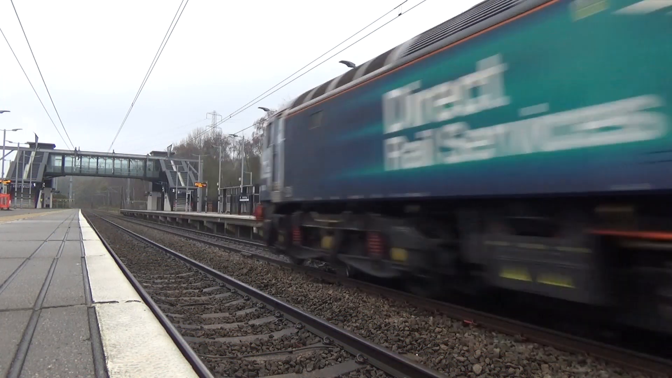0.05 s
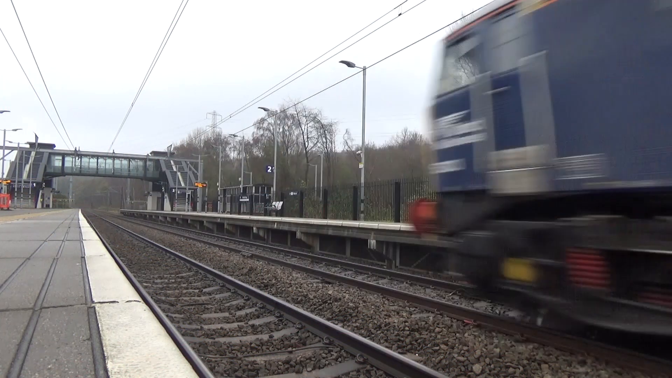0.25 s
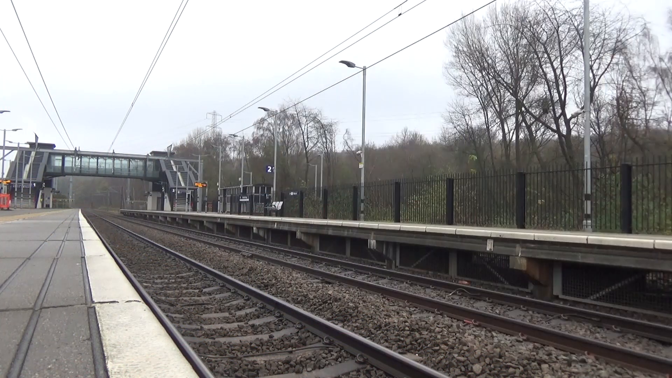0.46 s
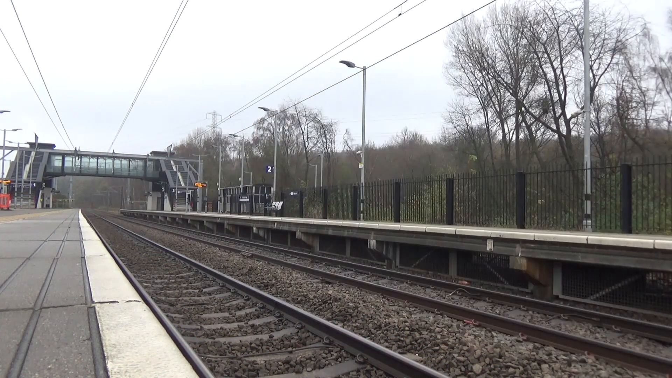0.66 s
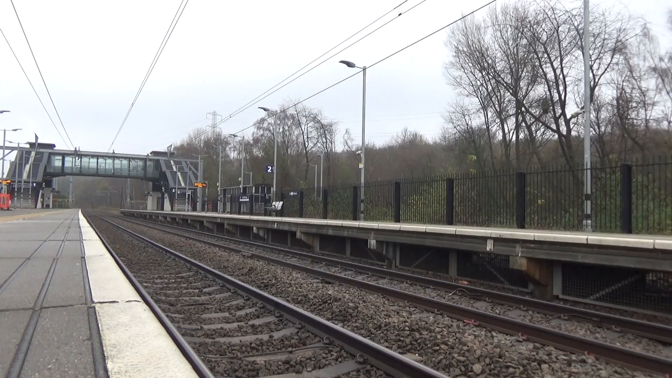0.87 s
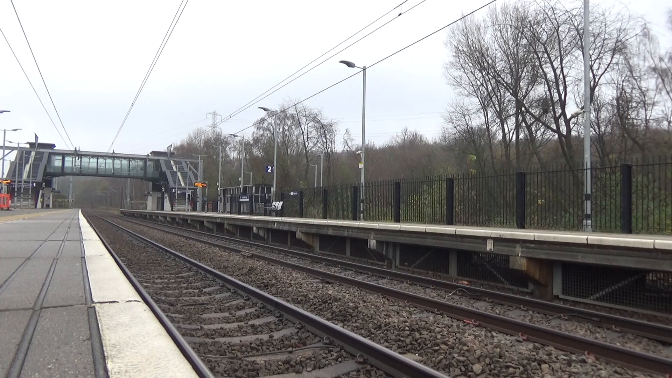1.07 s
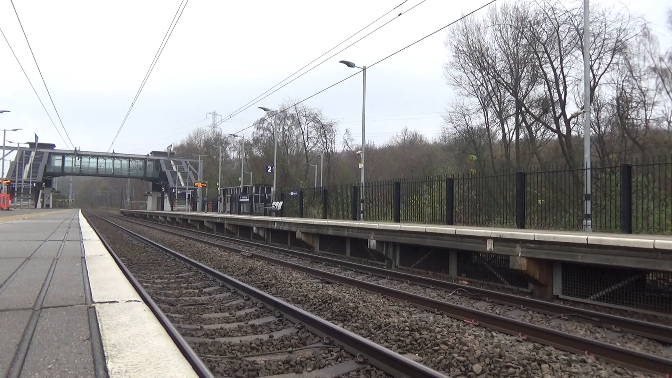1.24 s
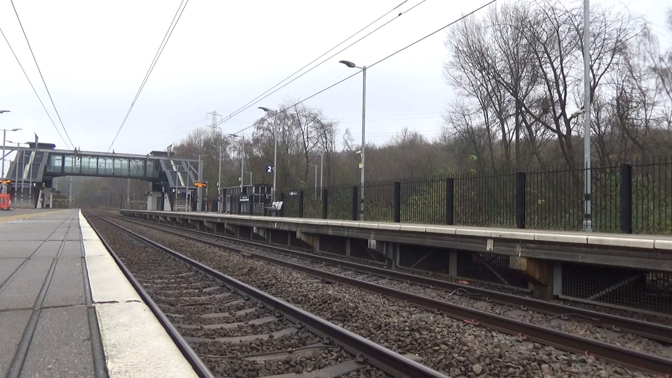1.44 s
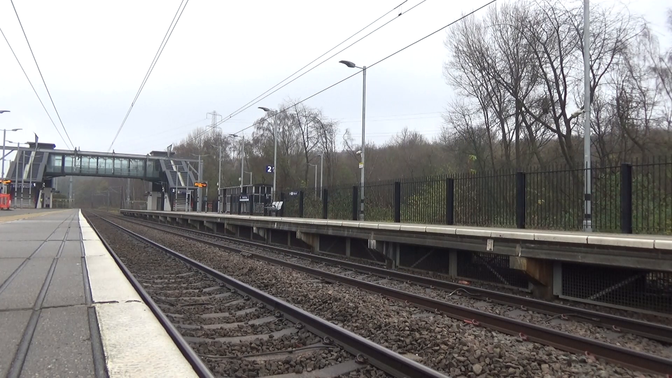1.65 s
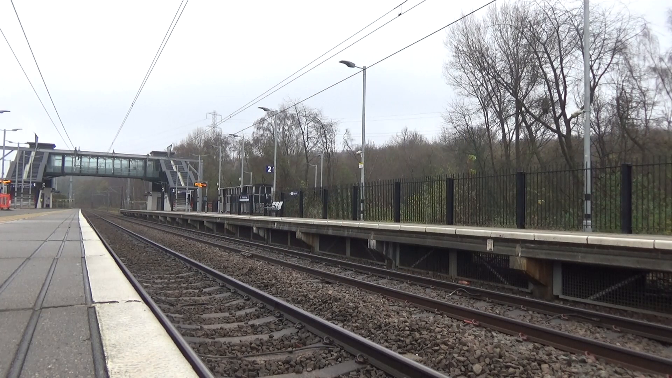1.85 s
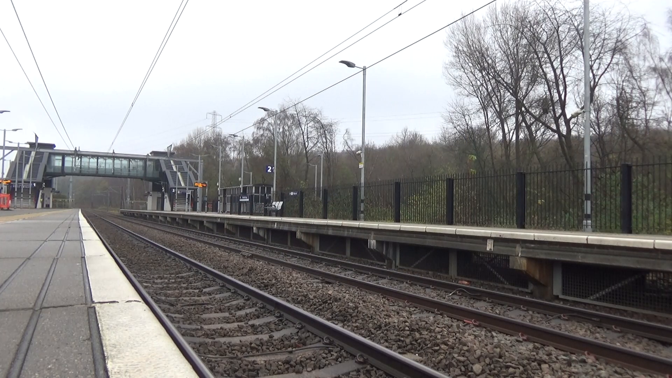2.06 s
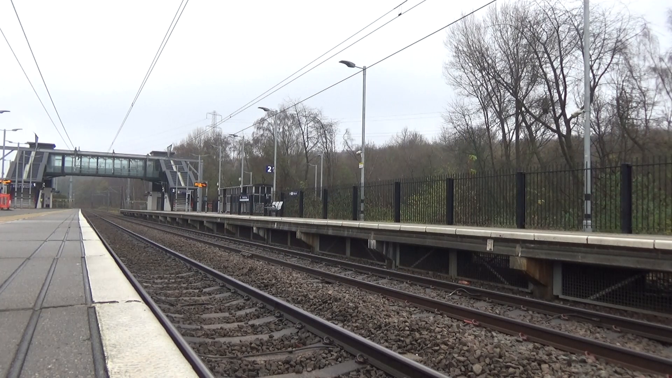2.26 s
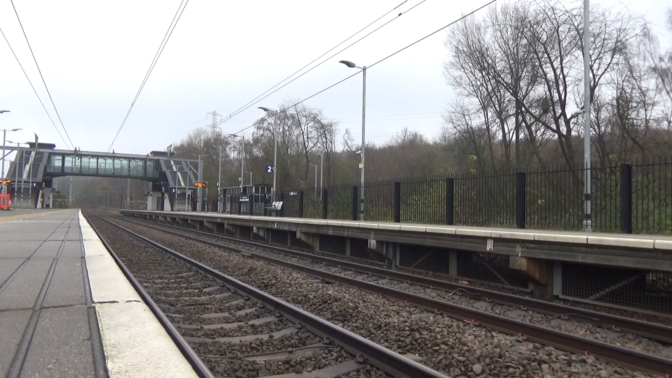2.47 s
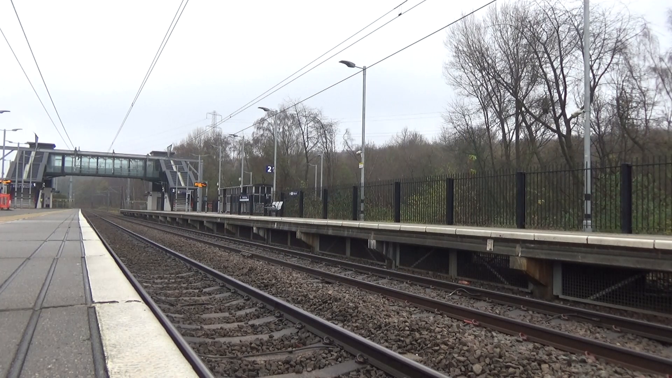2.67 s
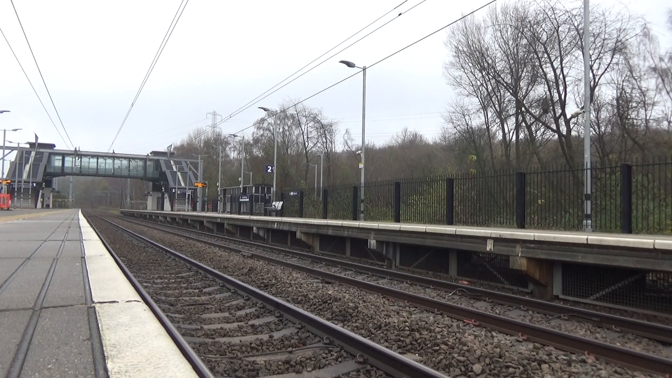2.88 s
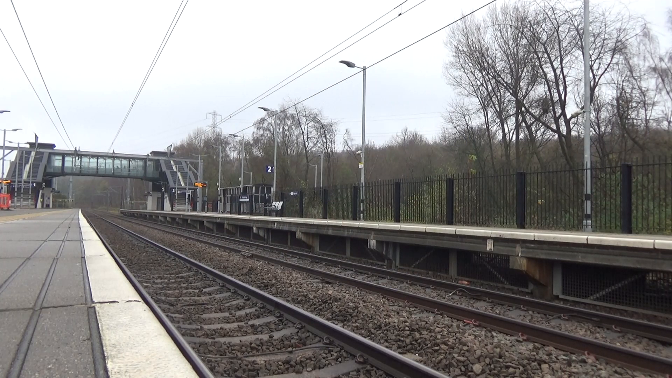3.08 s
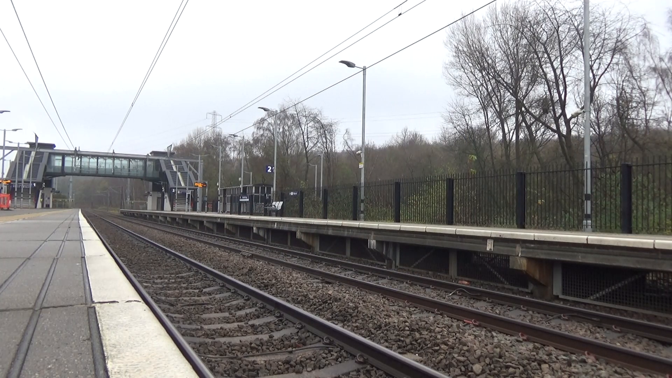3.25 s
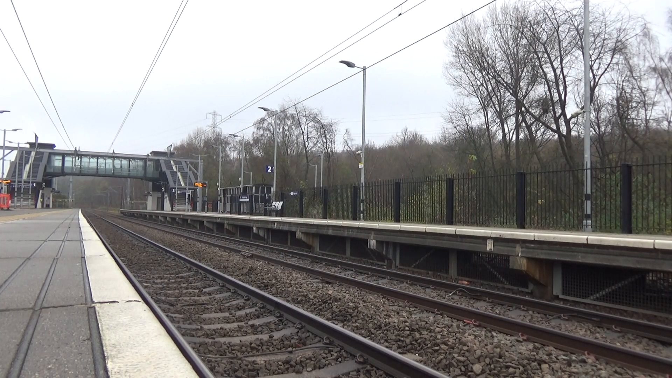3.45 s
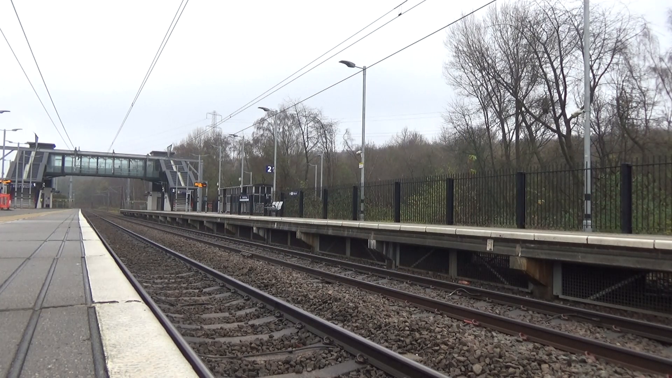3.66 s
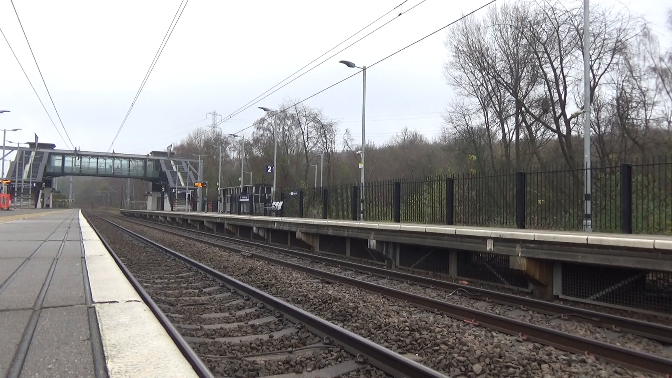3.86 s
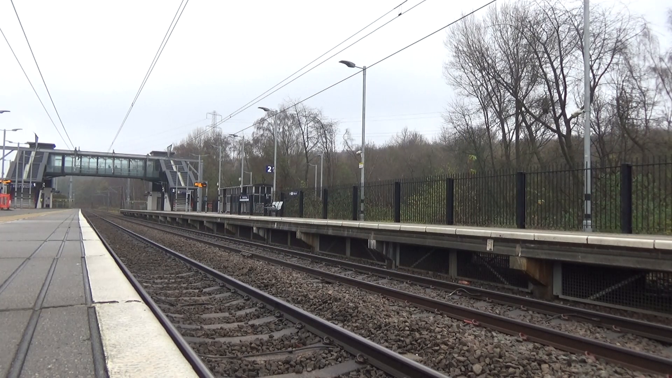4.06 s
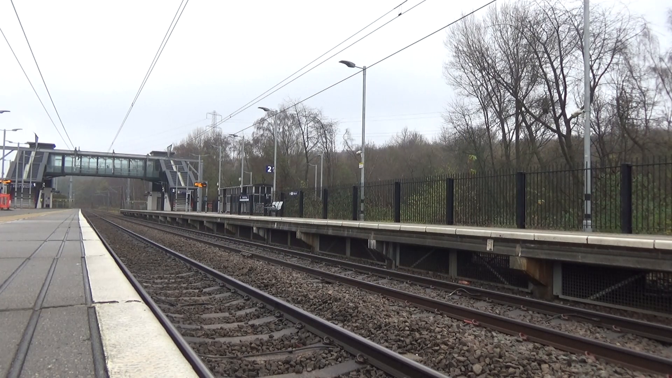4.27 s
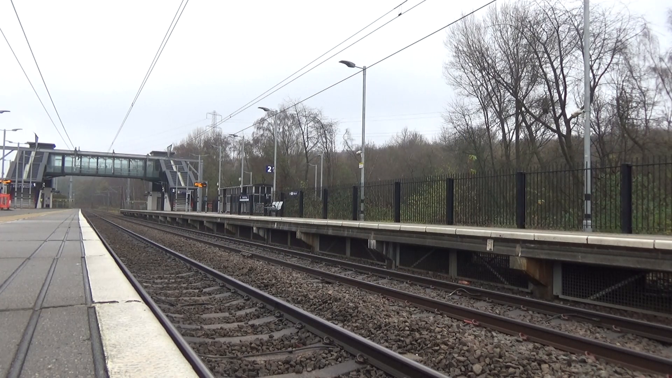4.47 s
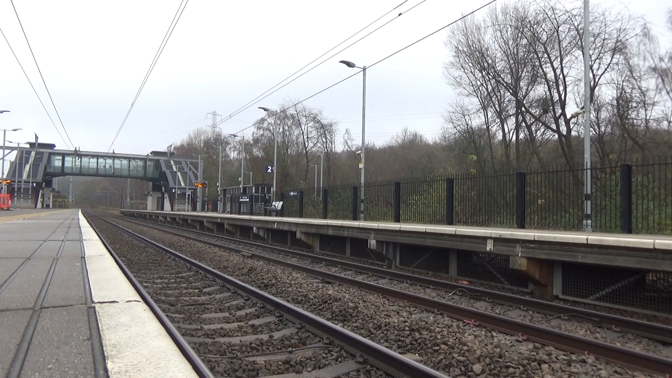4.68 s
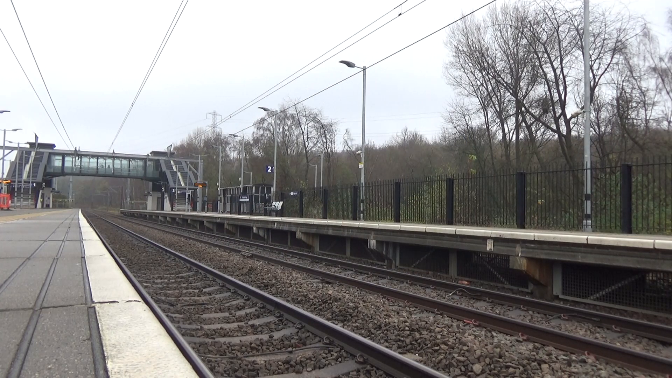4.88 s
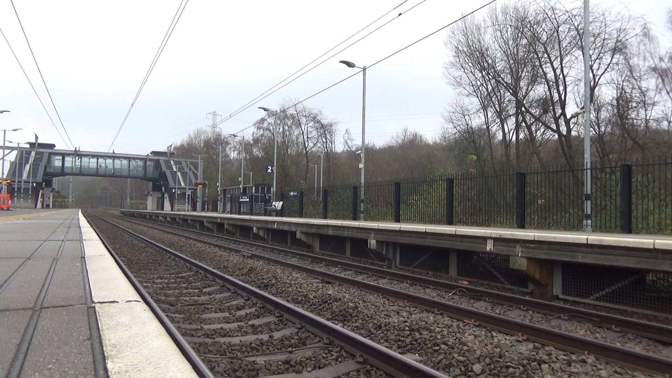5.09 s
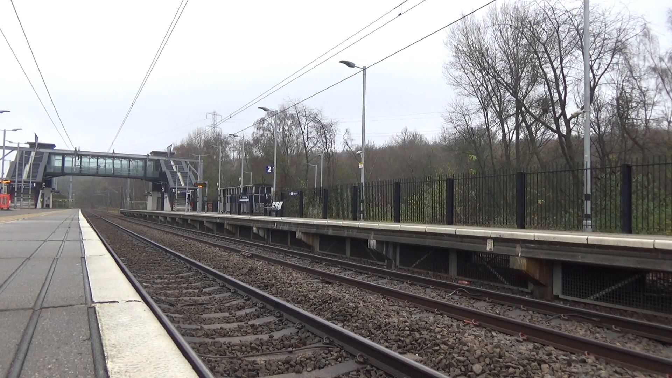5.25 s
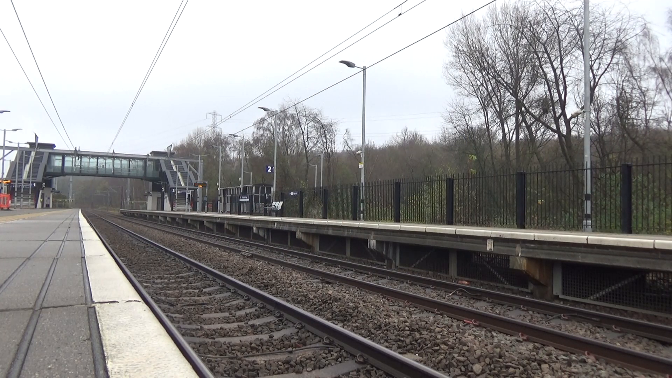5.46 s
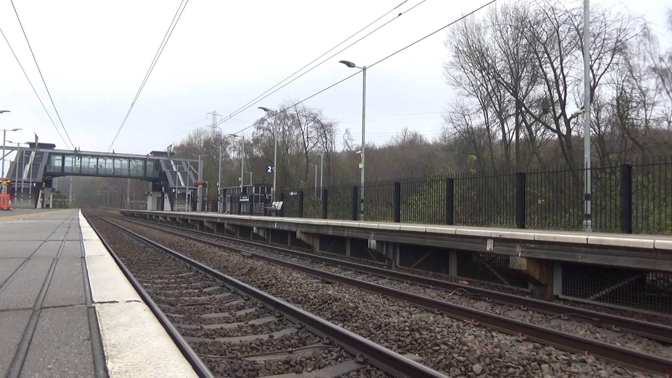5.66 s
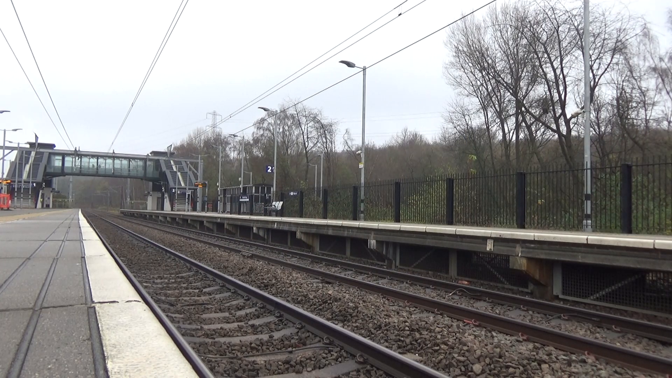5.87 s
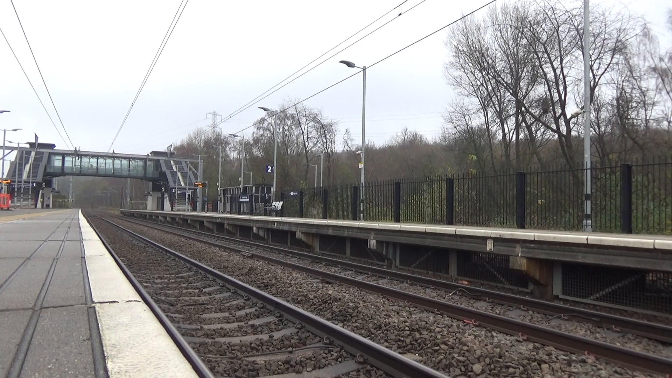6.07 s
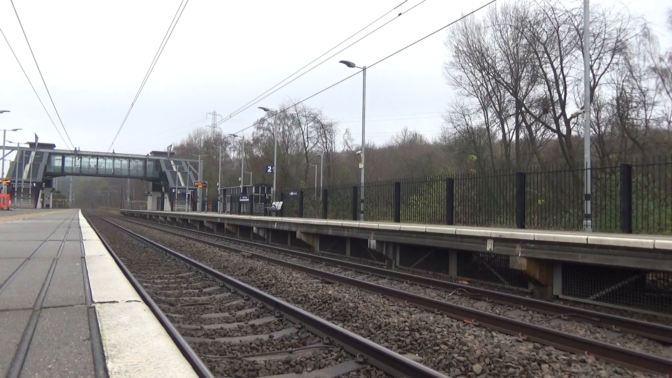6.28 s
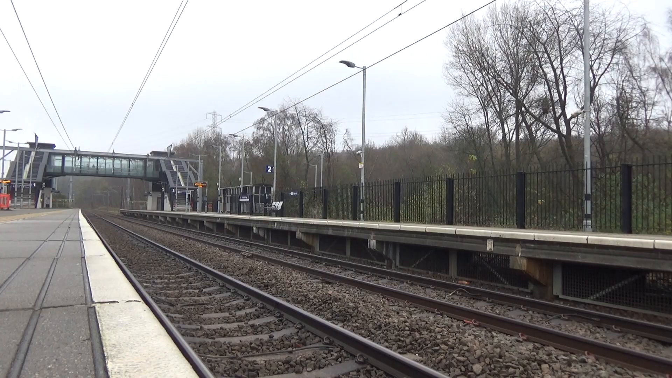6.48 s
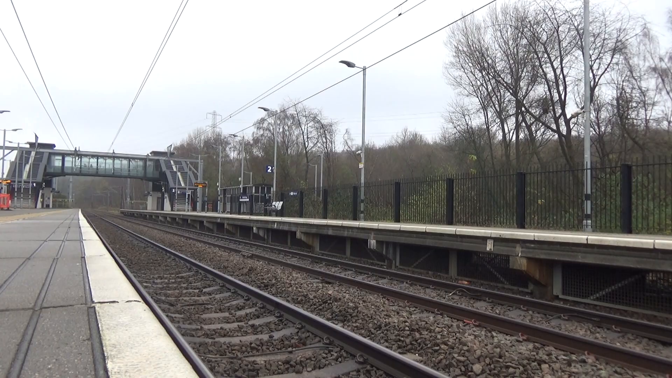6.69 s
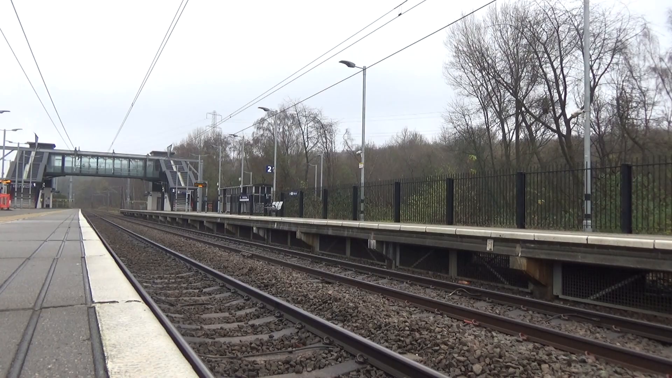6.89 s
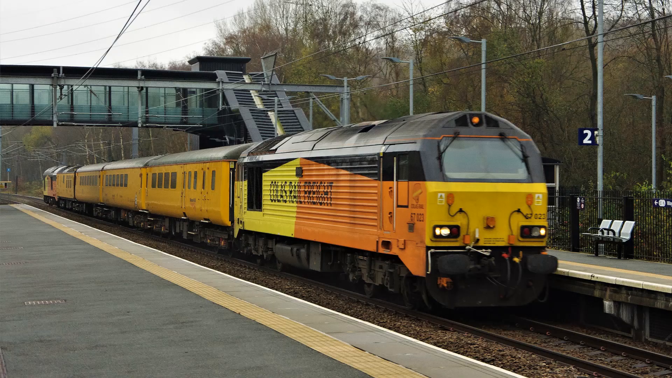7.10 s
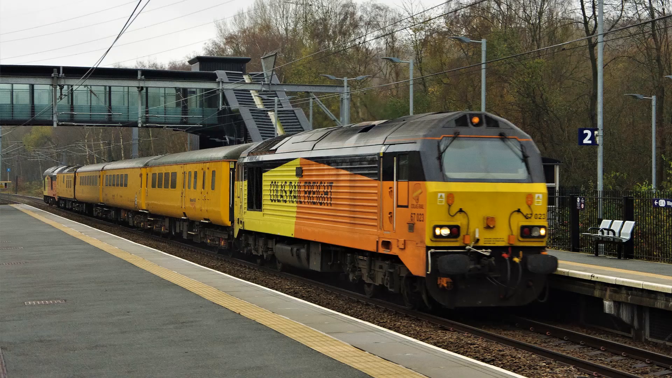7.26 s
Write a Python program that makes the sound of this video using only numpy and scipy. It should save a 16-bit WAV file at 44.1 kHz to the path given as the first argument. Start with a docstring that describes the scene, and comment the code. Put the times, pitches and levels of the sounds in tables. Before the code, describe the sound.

From the first instant a diesel locomotive rushes close past an outdoor platform with gritty roar, throbbing engine and brief metallic squeals. Its brightness drops away within a second, leaving humming, rapid wheel thumps and thin singing rails. A small bird chirps from three seconds. The train fades while low wake gusts buffet and overload the microphone, then everything stops abruptly at seven seconds.

```python
"""The rear diesel locomotive of a short train sweeps past a platform: roar, squeals and a howl, all noise or tones.
Its engine orders beat into a throb; a worn wheel thumps nine times a second and rings; steady tones hum, a thin
whine runs on. As it runs away down the line the rails sing in narrow bands, and from 3 s a small bird chirps.
From about 5 s the wake buffets the microphone in runs of short pressure swings; at 7 s the sound stops dead."""
import sys
import numpy as np
from scipy import signal
from scipy.fft import rfft, irfft, next_fast_len
from scipy.io import wavfile
from scipy.ndimage import uniform_filter1d

SR = 44100
rng = np.random.default_rng(int(sys.argv[2]) if len(sys.argv) > 2 else 0)


def materialize(psi):
    """Save the field psi as 16-bit PCM at rate SR to the path in sys.argv[1].

    A 1-D psi becomes a single channel; in a 2-D psi each row is a channel.
    """
    bounded = np.clip(np.atleast_2d(psi).T, -1, 1)
    quanta = np.round(bounded * 32767).astype(np.int16)
    wavfile.write(sys.argv[1], SR, quanta)


N = 323243
T = np.arange(N) / SR
FREQ = np.fft.rfftfreq(next_fast_len(N), 1 / SR)
WHEEL_HZ, FIRST_THUMP_S = 9.04, .065

# base level of rolling and hum: t/s, relative level/dB
TRAIN_LEVEL = [(0, -23), (.3, -18.5), (1.2, -25.5), (3.15, -23.5), (4.3, -28.5), (7, -36.5)]
# engine speed as heard: t/s, shaft rate/Hz
ENGINE_SPEED = [(0, 8.2), (.18, 9.1), (.35, 9.1), (.65, 6.7), (1.1, 7.8), (2.6, 7.73), (3.3, 8.18),
                (4.2, 7.87), (7, 8.7)]
# All *_swell tables: top/dB, reached/s, held/s, rise/(dB/s), fade/(dB/s)
# All spectra: f/Hz, relative density/dB


def undb(db):
    """Decibels to gain."""
    return 10 ** (np.asarray(db) / 20)


def unit(x):
    """Scale to rms 1."""
    return x / np.sqrt(np.mean(x ** 2))


def curve(rows):
    """Second column of a table, joined by straight lines in time."""
    t_s, value = np.transpose(rows)
    return np.interp(T, t_s, value)


def across(points):
    """Points joined on a log-frequency axis."""
    hz, value = np.transpose(points)
    return np.interp(np.log(FREQ + 1), np.log(hz), value)


def shape(x, response):
    """Filter by a frequency response."""
    size = next_fast_len(N)
    return irfft(rfft(x, size) * response, size)[..., :N]


def colour(x, points):
    """Filter x by a spectrum, then scale to rms 1."""
    return unit(shape(x, undb(across(points))))


def noise():
    """White noise."""
    return rng.standard_normal(N)


def walk(rate_hz, size=N):
    """Random levels held 1 / rate_hz and smoothed twice; spread near 1."""
    k = int(SR / rate_hz)
    held = np.repeat(rng.standard_normal(size // k + 1), k)
    return 1.35 * uniform_filter1d(uniform_filter1d(held, k), k)[:size]


def swell(top_db, reached_s, hold_s, rise_db_per_s, fade_db_per_s):
    """A gain that rises, holds and fades at even rates in dB."""
    before_s = np.maximum(reached_s - T, 0)
    after_s = np.maximum(T - reached_s - hold_s, 0)
    return undb(top_db - rise_db_per_s * before_s - fade_db_per_s * after_s)


def blows(rows, decay_s, rise_s=1 / SR):
    """Envelope of a table of (t/s, level/dB) blows that die away."""
    out = np.zeros(N)
    for t_s, db in rows:
        rise = 1 - np.exp(-np.maximum(T - t_s, 0) / rise_s)
        out += undb(db) * rise * np.exp(-np.abs(T - t_s) / decay_s)
    return out


def rough_tone(cycles, rate_hz):
    """A tone whose strength and phase flutter about rate_hz times a second; rms near 1."""
    in_phase = walk(rate_hz, size=len(cycles)) * np.sin(2 * np.pi * cycles)
    quadrature = walk(rate_hz, size=len(cycles)) * np.cos(2 * np.pi * cycles)
    return in_phase + quadrature


def tread(repeat):
    """Wheel roughness recurs every turn (power share repeat); rail roughness is always new."""
    one_turn = noise()[:round(SR / WHEEL_HZ)]
    return np.sqrt(repeat) * np.resize(one_turn, N) + np.sqrt(1 - repeat) * noise()


def thumps(lead_s, rise_s, decay_s):
    """One pulse for every turn of the worn wheel, swelling as it passes."""
    thump_swell = (0.87, 1.37, 1, 8.8, 2.8)
    since_s = (T - FIRST_THUMP_S + lead_s) % (1 / WHEEL_HZ)
    return swell(*thump_swell) * (1 - np.exp(-since_s / rise_s)) * np.exp(-since_s / decay_s)


def to_right(x, pan_db, scatter_db):
    """Microphone directivity varies with frequency; scattered sound fills the left side."""
    # f/Hz, multiplier of the mean left-right difference/1
    pan_share = [(60, 0.13), (110, -0.5), (200, 0.55), (350, 0.38), (640, 1.06), (1160, 0.57), (2100, 0.7),
                 (3800, 0.66), (6800, 0.4), (12000, 0)]
    mean_db = np.mean(pan_db)
    ratio = undb(mean_db * across(pan_share))
    left, right = shape(x, 2 * ratio / (1 + ratio)), shape(x, 2 / (1 + ratio))
    lag_s = T[:SR // 5]
    tail = rng.standard_normal(len(lag_s)) * np.exp(-lag_s / 0.02)
    scatter = signal.fftconvolve(x, tail / np.linalg.norm(tail))[:N]
    moving = undb(0.78 * (pan_db - mean_db))
    return np.array([left * moving + undb(scatter_db) * scatter, right])


def bird():
    """Thin, very high chirps with sliding pitch; decaying noise echoes linger among the trees."""
    # t/s, level before chirp_db/dB, f/Hz, length/s, opening pitch offset/Hz
    chirp_rows = [(3.09, -39, 8870, .022, 100), (3.489, -37, 8240, .022, 0), (4.22, -42, 8420, .03, 100),
                  (4.755, -44, 8240, .035, -150), (4.96, -48, 8300, .03, 0), (5.04, -48, 9000, .022, 900),
                  (5.403, -46, 8170, .03, 100), (5.618, -43, 8210, .035, -150),
                  (5.715, -51, 9030, .02, 700), (5.873, -43, 8260, .028, 0),
                  (6.106, -44.5, 8750, .028, 1000), (6.356, -39, 8190, .034, 0),
                  (6.612, -50, 8190, .035, -100), (6.778, -42.5, 8320, .028, -100),
                  (6.868, -47.5, 8850, .028, 900)]
    chirp_db, trees_db, trees_decay_s, slide_s = -7.5, -1, .05, .008
    out = np.zeros(N)
    age_s = T[:SR // 8]
    for t_s, db, hz, length_s, slide_hz in chirp_rows:
        pitch_hz = hz + slide_hz * np.exp(-age_s / slide_s) + 40 * walk(500, size=len(age_s))
        envelope = undb(db + chirp_db) * np.sin(np.pi * np.clip(age_s / length_s, 0, 1))
        start = int(t_s * SR)
        out[start:start + len(age_s)] += envelope * np.sin(2 * np.pi * np.cumsum(pitch_hz) / SR)
    trees = rng.standard_normal((2, SR // 4)) * np.exp(-T[:SR // 4] / trees_decay_s)
    echo = signal.fftconvolve(out[None], trees / np.linalg.norm(trees))[:, :N]
    return out + undb(trees_db) * echo


def rails():
    """Steel carries narrow treble bands far along the track, pulsing with the wheel; grit sets off pings."""
    singing_spectrum = [(4000, -47), (5600, -19.5), (6350, -18), (6560, 0), (6820, 0.5), (7100, -2),
                        (7700, -21.5), (9300, -49), (10400, -36), (11100, -14.5), (11600, -14.5)]
    hiss_spectrum = [(2500, -3), (4400, -6.5), (5600, 4), (6500, 12), (7400, 8.5), (9200, 1), (10600, 6),
                     (11650, 4.5)]
    # rail pings: t/s, level before the common -8 dB/dB
    ping_rows = [(0.939, -27), (1.717, -24), (2.705, -23), (2.814, -18), (3.034, -15.5), (3.912, -19),
                 (4.352, -26), (4.571, -29)]
    singing_swell = (-33, 3, 0.59, 3.5, 6)
    modes_swell = (-42, 3, 0.43, 10.5, 3)
    hiss_near_swell = (-33, 0, 0.55, 10, 48)
    hiss_swell = (-36, 0.31, 2, 14, 8.5)
    sizzle_swell = (-52, 4.5, 0.2, 30, 60)
    far_db, hiss_pulse_db = -49, 0.5
    turn = np.cos(2 * np.pi * WHEEL_HZ * (T - FIRST_THUMP_S))

    singing = colour(tread(0.11), singing_spectrum) * np.hypot(swell(*singing_swell), undb(far_db))
    modes = sum(rough_tone(hz * T, rate_hz=55) for hz in (6792, 6863))
    singing += modes * swell(*modes_swell)
    flutter = undb(1.3 * walk(80) + 0.8 * turn)

    hiss = colour(noise(), hiss_spectrum) * np.hypot(swell(*hiss_near_swell), swell(*hiss_swell))
    hiss *= undb(1.1 * walk(90) + hiss_pulse_db * turn)

    ping_spectrum = [(5500, -45), (6400, -14), (6800, 0), (7300, -10), (8200, -26), (9800, -24), (11500, -13)]
    pings = blows(ping_rows, decay_s=.014) * undb(-8) * colour(noise(), ping_spectrum)
    sizzle = rough_tone(7750 * T, rate_hz=900) * swell(*sizzle_swell)
    return to_right(singing * flutter + hiss + pings + sizzle, pan_db=-5.0, scatter_db=-7.0)


def wake():
    """Gusts are runs of weakening pressure swings with churning noise; the strongest saturate the microphone."""
    wake_spectrum = [(20, -16), (60, -0.5), (130, 0.5), (220, -6.5), (400, -15), (900, -32), (3000, -71)]
    # gusts: t/s, length/s, strength before saturation/dB, nominal eddy f/Hz
    gust_rows = [(4.876, 0.039, -25.5, 120.1), (4.986, 0.098, -20.5, 115.2), (5.19, 0.03, -5.5, 119),
                 (5.266, 0.027, -11.5, 149.6), (5.3, 0.051, -19, 115), (5.366, 0.039, -15.5, 100),
                 (5.573, 0.019, -8, 160), (5.606, 0.057, -13, 122.6), (5.812, 0.034, -13.5, 134),
                 (5.877, 0.03, -15.5, 120), (6.08, 0.073, -17.5, 165), (6.177, 0.0093, -11.5, 241.4),
                 (6.23, 0.011, -7.5, 172), (6.251, 0.038, -2.5, 155), (6.324, 0.014, -9, 151),
                 (6.377, 0.023, -4, 250), (6.502, 0.052, -4, 134), (6.617, 0.018, -11, 269.5),
                 (6.676, 0.0084, -6.5, 278), (6.738, 0.013, -7.5, 282), (6.809, 0.0097, -15, 240)]
    # background churning: rises steeply to 6 s, then holds
    wake_swell = (-28.5, 6, 1.5, 48, 11.5)
    eddy_gap_s, eddy_jitter, eddy_cycles, gust_sag_db = .017, .2, 0.25, 2.5
    churn_db, churn_attack_s, churn_release_s = -15, 0.014, 0.022
    mic_limit = .7  # full scale 1
    churn = colour(noise(), wake_spectrum) * undb(2.3 * walk(60))
    out, stir = np.zeros(N), swell(*wake_swell)
    lag_s = np.arange(-SR // 30, SR // 30) / SR
    for t_s, length_s, db, hz in gust_rows:
        force = undb(db - gust_sag_db * np.clip((T - t_s) / length_s, 0, 1))
        attack = np.maximum(t_s - T, 0) / churn_attack_s
        release = np.maximum(T - t_s - length_s, 0) / churn_release_s
        stir = np.hypot(stir, undb(churn_db) * force * np.exp(-attack - release))
        at_s = t_s
        for gap, pitch, phase in rng.uniform(-1.13, 1, size=(16, 3)):
            if at_s > t_s + length_s:
                break
            cycles = hz * (1 + eddy_jitter * pitch) * lag_s
            swing = np.sin(2 * np.pi * (cycles + 0.098 * phase)) / np.cosh(cycles / eddy_cycles)
            start = int((at_s + lag_s[0]) * SR)
            out[start:start + len(lag_s)] += force[int(at_s * SR)] * swing
            at_s += eddy_gap_s * (1 + eddy_jitter * gap)
    return mic_limit * np.tanh((out + churn * stir) / mic_limit)


def squeals():
    """Flanges catch the rail for moments; rough tones overlap and sag in pitch."""
    # t/s, length/s, rms before the envelope/dB, starting f/Hz, flutter/Hz
    squeal_rows = [(.065, .05, -32, 1890, 90), (.055, .04, -35, 3130, 90), (.17, .08, -33, 4300, 340),
                   (.245, .05, -34, 2130, 150), (.25, .09, -31.5, 2630, 70), (.24, .1, -35.5, 3330, 90),
                   (.31, .22, -34, 3330, 450), (.32, .17, -35.5, 3160, 150), (.505, .04, -28.5, 2000, 60),
                   (.51, .07, -36.5, 2420, 130)]
    sag_hz_per_s = 900
    scrapes = []  # fainter squeals scattered in time and pitch
    for when, pitch in rng.random((18, 2)):
        t_s = np.interp(when, (0, 1), (0, .56))
        hz = np.interp(pitch, (0, 1), (1500, 3400))
        scrapes.append((t_s, .06, -38.5, hz, 60))
    out = np.zeros(N)
    for t_s, length_s, db, hz, flutter_hz in squeal_rows + scrapes:
        age_s = T[:int(length_s * SR)]
        tone = rough_tone(hz * age_s - sag_hz_per_s * age_s ** 2 / 2, rate_hz=flutter_hz)
        envelope = undb(db) * np.sqrt(np.sin(np.pi * age_s / length_s))
        start = int(t_s * SR)
        out[start:start + len(age_s)] += envelope * unit(tone)
    return out


def bogies():
    """Gritty roar beside the running gear, with squeals, a howl and a bright rush that ends with the last axle."""
    roar_spectrum = [(25, -14.5), (55, -3), (130, 3.5), (300, -3.5), (700, 1.5), (1200, -11), (1900, -8),
                     (2600, -10), (3200, -11), (4400, -20), (6300, -10), (9000, -27.5), (12000, -37)]
    rush_spectrum = [(1500, -20.5), (3200, -1.5), (4300, -5), (6000, -5), (9000, -5.5), (11500, -9)]
    roar_swell = (-20, 0, 0.3555, 10, 23.5)
    rush_swell = (-25.5, 0, 0.27, 10, 79)
    howl_swell = (-23.5, 0.25, 0.3, 15, 55)
    howl_hz = 608
    roar = colour(noise() * undb(1.4 * walk(160)), roar_spectrum) * swell(*roar_swell)
    rush = colour(noise(), rush_spectrum) * swell(*rush_swell)
    howl = walk(69.8) * np.sin(2 * np.pi * howl_hz * T) * swell(*howl_swell)
    return to_right(roar + rush + squeals() + howl, pan_db=-11, scatter_db=-17.5)


def engine():
    """Uneven cylinders put lines on the shaft orders; neighbouring ones beat into a slow throb."""
    # order (multiple of shaft rate)/1, relative level/dB
    order_rows = [(3, -29), (4, -29.5), (5, -26), (6, 1.5), (7, -0.5), (8, -11), (9, -4), (12, -22.5),
                  (16, -30.5), (18, -26.5), (20, -16)]
    near_swell = (-26.8, 0.05, 0.22, 15, 35)
    far_swell = (-37, 3.5, 1.5, 1, 4.7)
    throb_s = 1.125  # orders line up in phase here, but for their jitter
    turns = np.cumsum(curve(ENGINE_SPEED)) / SR
    turns = turns - np.interp(throb_s, T, turns)
    lines = np.zeros(N)
    for order, db in order_rows:
        level = undb(db + 1.2 * walk(4))
        lines += level * np.cos(2 * np.pi * (order * turns + .02 * walk(5)))
    gas = colour(noise(), [(20, -22.0), (40, -10.5), (55, 18.5), (75, -5.0), (110, -13.5), (400, -54)])
    gain = np.hypot(swell(*near_swell), swell(*far_swell))
    return (unit(lines) + undb(-5.5) * gas) * gain * undb(np.array([[.3], [-.3]]))


def hum_and_whine():
    """Wheel and track resonances and two low lines from a second engine hum, surging with each thump; a whine
    is steady close by, fluttering far off."""
    # hum: f from 1 s on/Hz, relative level/dB, strongest at t/s
    hum_rows = [(186.6, -1.5, 3.53), (195.5, -4, 5.2), (285, -1.5, 3.05), (361, 4.5, 1.65), (382, 0.5, 3.3),
                (598, 1.5, 2.5), (635, 2.5, 3), (676, -1, 3), (742, 2.5, 2.3), (814, 5, 2.3), (831, 5, 2.9),
                (931, -4, 1.9), (1022, -6, 3), (1076, -5, 2.5)]
    # far whine: f/Hz, relative level/dB
    whine_rows = [(2220, -1), (2772, -6.5)]
    whine_swell = (-47.5, 1.5, 2.5, 41, 3)
    near_swell = (-38.5, 0.7, 0.27, 50, 22)
    hum_pulse, near_hz = 0.7, 2230
    rate_hz = curve(ENGINE_SPEED)
    # hum pitch moves in proportion to ENGINE_SPEED up to 1 s, then holds
    clock_s = np.cumsum(np.where(T < 1, rate_hz / rate_hz[SR], 1)) / SR
    hum = np.zeros(N)
    for hz, db, peak_s in hum_rows:
        fall_db = 8.8 * np.tanh(((T - peak_s) / 1.25) ** 2)
        level = undb(db - fall_db + 1.8 * walk(14))
        hum += level * np.sin(2 * np.pi * (hz * clock_s + .17 * walk(17)))
    surge = 1 + hum_pulse * thumps(lead_s=0, rise_s=.012, decay_s=.038)

    whine = sum(undb(db - .5 + 2.2 * walk(9)) * rough_tone(hz * T, rate_hz=55) for hz, db in whine_rows)
    close = undb(1.5 * walk(25)) * np.sin(2 * np.pi * (near_hz * T + .09 * walk(45)))
    whines = whine * swell(*whine_swell) + close * swell(*near_swell)
    return hum * surge * undb(curve(TRAIN_LEVEL) - 12.0) + whines


def wheels():
    """The worn spot rings the wheel disc briefly, then the bogie and sleepers rumble on."""
    rumble_spectrum = [(40, -23), (100, -13), (170, -8), (250, -5.5), (360, -3), (460, -2.5), (620, -1.5),
                       (830, -4), (950, -6.5), (1200, -11), (2000, -16), (3000, -24), (4500, -41),
                       (8000, -66.5)]
    # disc modes before sharpening: f/Hz, width/Hz, relative level/dB
    mode_rows = [(1433, 60, -0.5), (1500, 60, -3), (1655, 42, 3.5), (1763.4, 79, 5), (1855, 70, -1)]
    # harder strikes on the disc: t/s, level re steady excitation/dB
    strike_rows = [(4.272, 2), (4.602, 4), (5.152, 2), (5.378, 7), (5.487, 6), (6.038, 11), (6.15, 6)]
    # track knocks: t/s, level/dB
    knock_rows = [(1.064, -13)]
    # running-gear clanks: t/s, level before the common -10.5 dB/dB
    clank_rows = [(1.401, -17), (1.511, -18), (1.622, -11.5), (1.734, -8.5), (1.955, -13), (2.066, -15),
                  (2.285, -16), (3.06, -15)]
    # t/s, nominal left minus right/dB
    pan_rows = [(0, -10), (.65, -47.5), (1.1, -26), (3.2, -22), (7, -13.5)]
    near_swell = (-37, 0, -0.1, 19.5, 37.5)
    ring_swell = (-36, 2.5, 1.28, 6.5, 3.5)

    rumble = colour(tread(0.4) * undb(0.5 * walk(70)), rumble_spectrum)
    beat = thumps(lead_s=-.003, rise_s=.007, decay_s=.042)
    thud_spectrum = [(150, -34.0), (340, -1.0), (440, -6.5), (620, 1.5), (840, 2.0), (1000, -9.0),
                     (1500, -22.0), (3000, -45.5)]
    thuds = colour(tread(0.23) * beat, thud_spectrum)
    rolling = (undb(-1.2) * rumble + undb(-6) * thuds) * undb(curve(TRAIN_LEVEL))

    disc = sum(undb(db) / (1 + 2j * (FREQ - hz) / width_hz) for hz, width_hz, db in mode_rows)
    strike = 5.8 * thumps(lead_s=.005, rise_s=.007, decay_s=.014) * undb(2 * walk(9))
    strike += blows(strike_rows, decay_s=.018)
    ring = unit(shape(tread(0.14) * (1 + strike), disc * np.abs(disc) ** 0.55))  # power sharpens the modes
    ring *= np.hypot(swell(*near_swell), swell(*ring_swell))

    knock_spectrum = [(100, -19.5), (280, -15), (360, 1.0), (500, -11.5), (750, -3.5), (1300, -47.0), (4000, -55)]
    knocks = blows(knock_rows, decay_s=0.058, rise_s=.008) * colour(noise(), knock_spectrum)
    clank_spectrum = [(200, -15), (750, 0), (1100, -5), (2200, -20), (5000, -45)]
    clanks = undb(-10.5) * blows(clank_rows, decay_s=.005) * colour(noise(), clank_spectrum)
    return to_right(rolling + hum_and_whine() + ring + knocks + clanks, curve(pan_rows), scatter_db=-22.0)


def scene():
    """Bird, track, wind and train together."""
    return bird() + rails() + wake() + bogies() + engine() + wheels()


def record(dry):
    """Stop the sound within 2 ms, then cut the treble with a steep elliptic low-pass."""
    stop_s, top_hz = 7.013, 11750
    stop = np.clip((stop_s - T) / .002, 0, 1)
    low_pass = signal.ellip(12, .2, 80, top_hz, fs=SR, output="sos")
    return signal.sosfilt(low_pass, dry * stop)


dry = scene()
out = record(dry)
materialize(out)
```